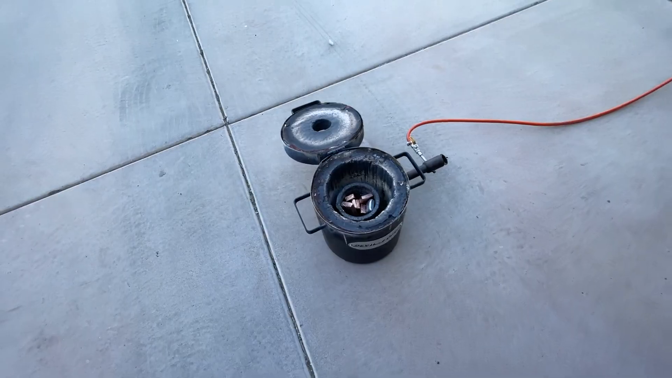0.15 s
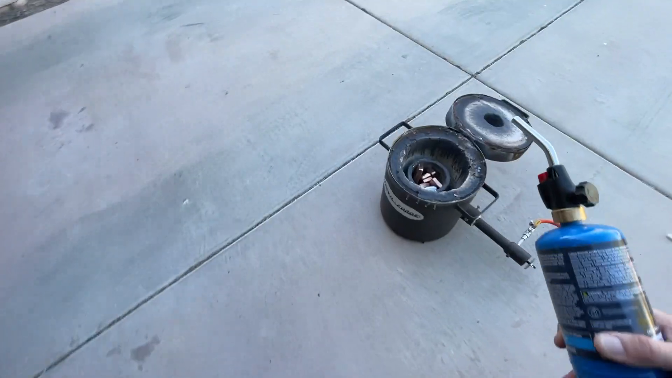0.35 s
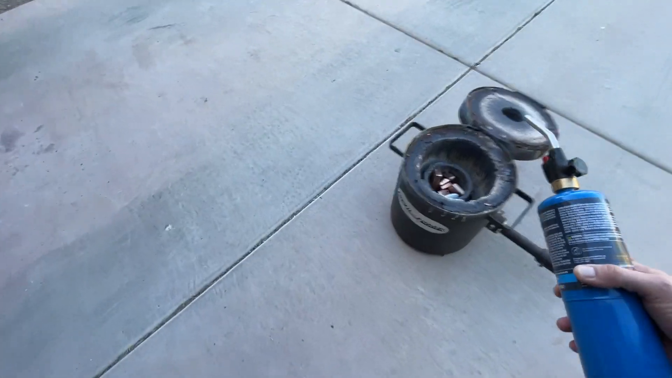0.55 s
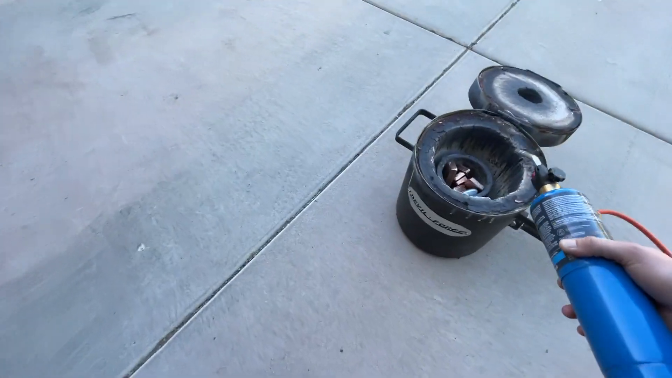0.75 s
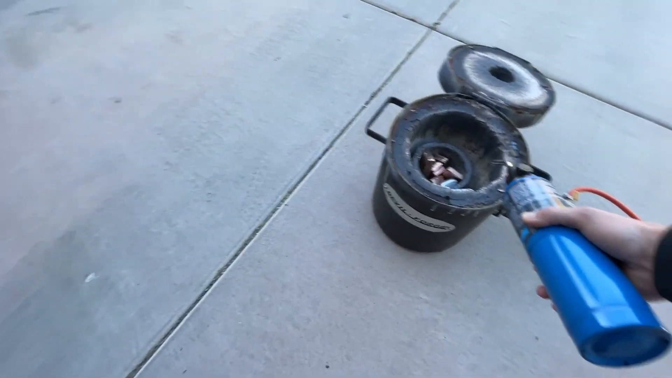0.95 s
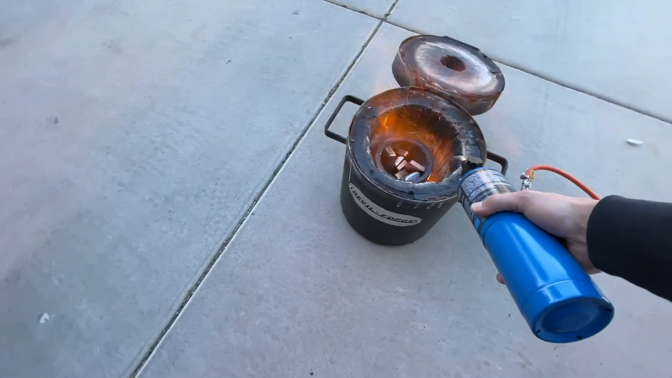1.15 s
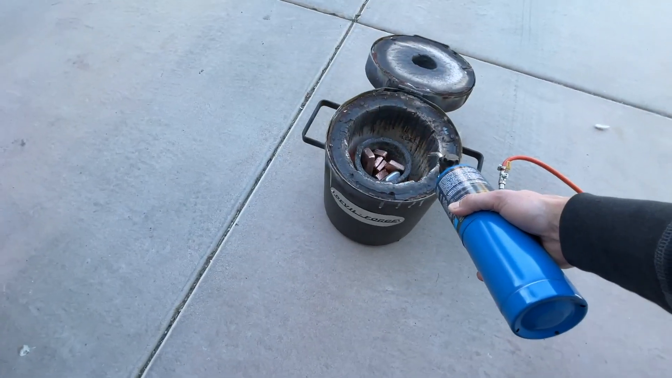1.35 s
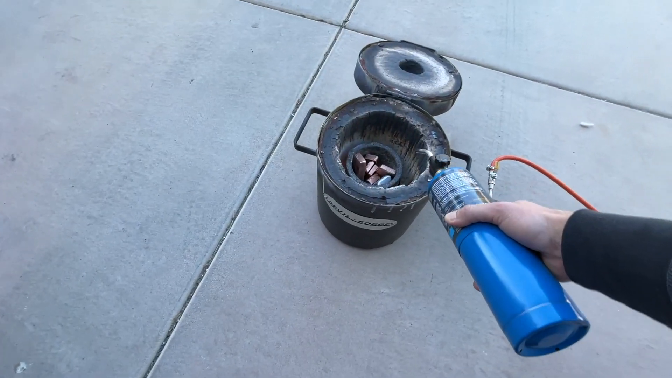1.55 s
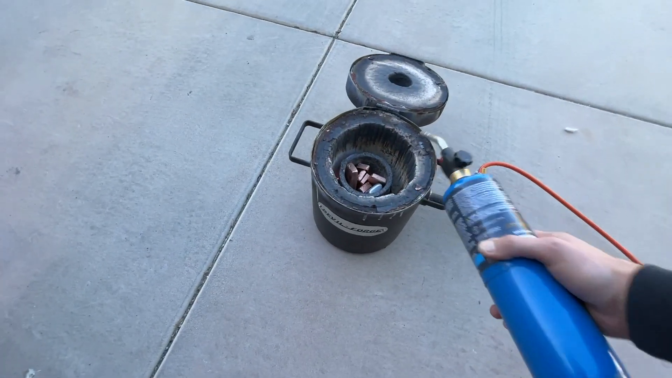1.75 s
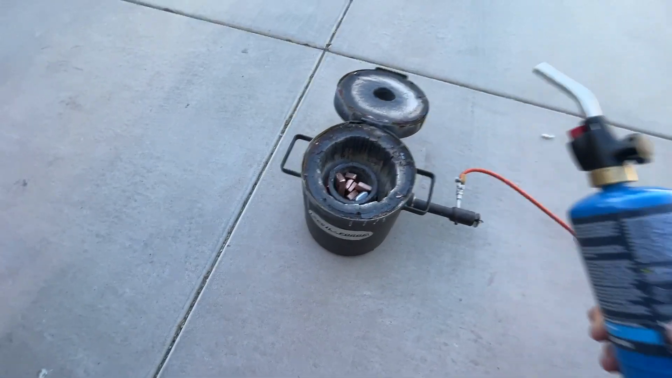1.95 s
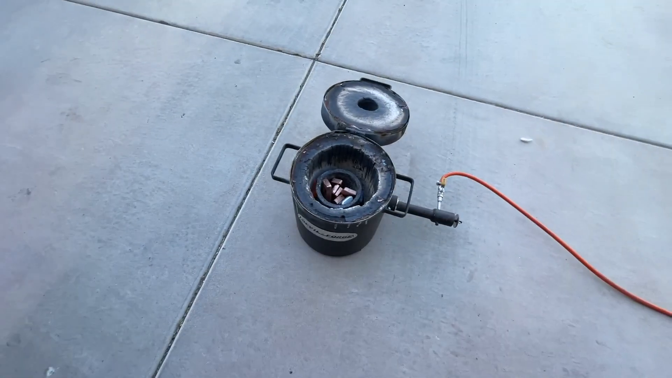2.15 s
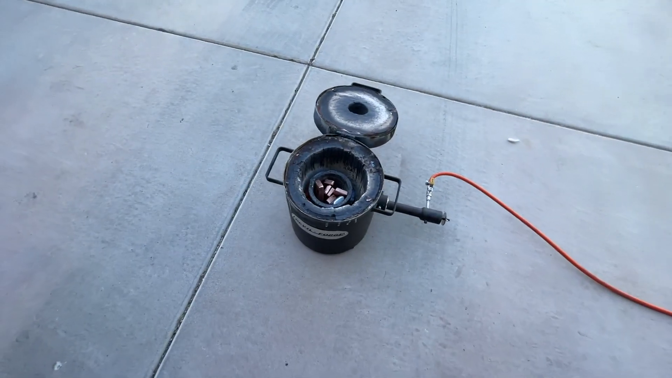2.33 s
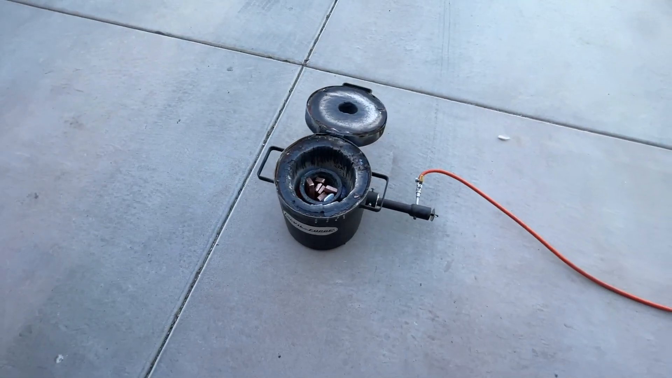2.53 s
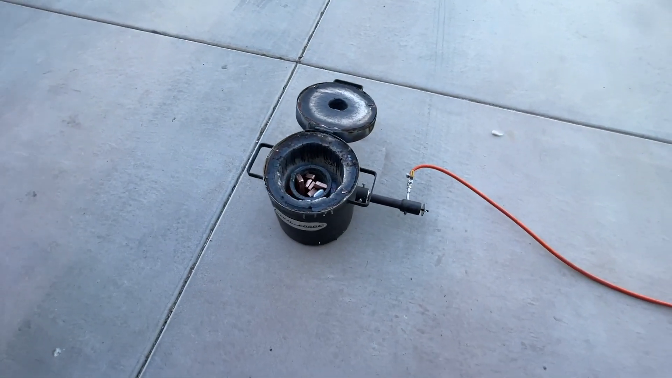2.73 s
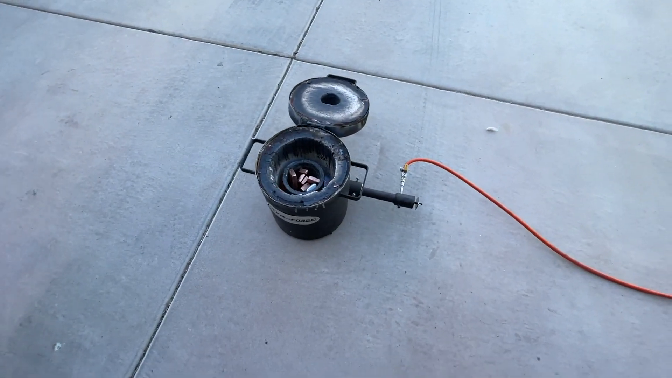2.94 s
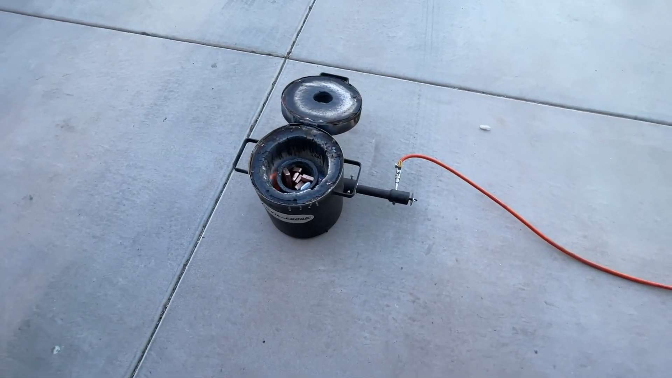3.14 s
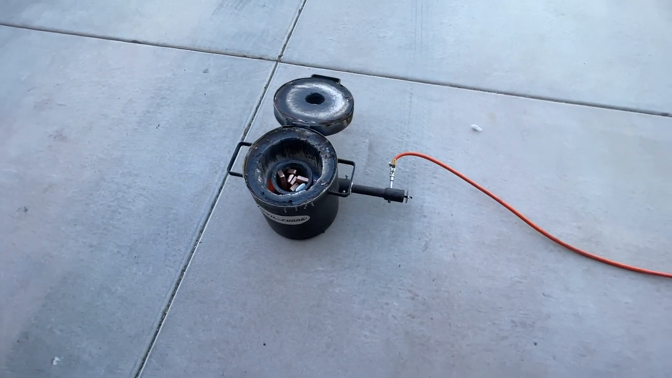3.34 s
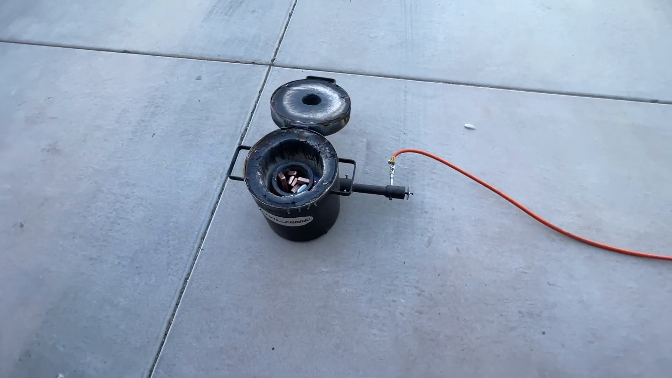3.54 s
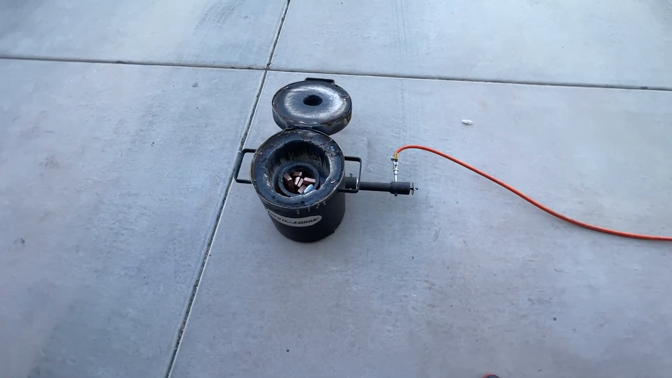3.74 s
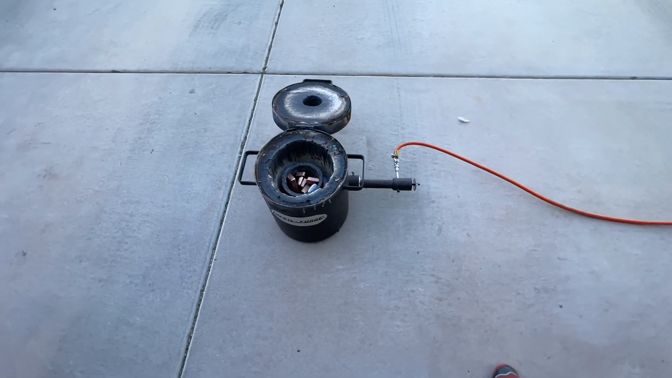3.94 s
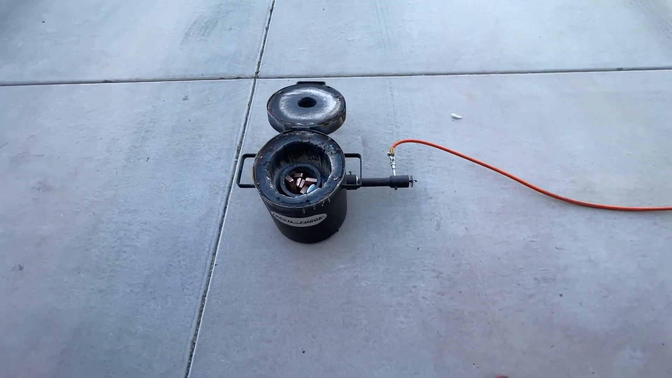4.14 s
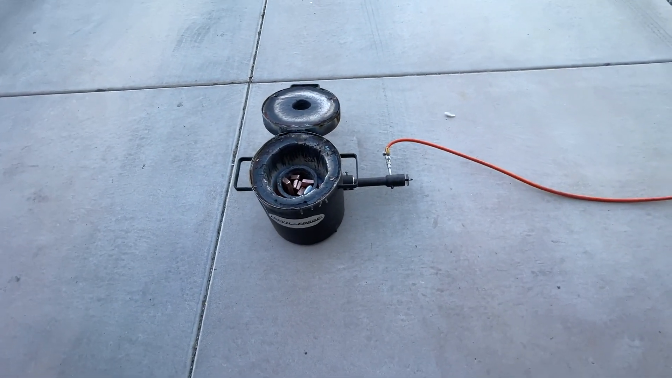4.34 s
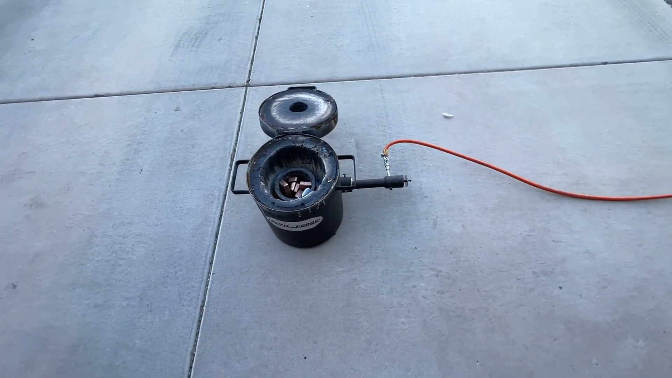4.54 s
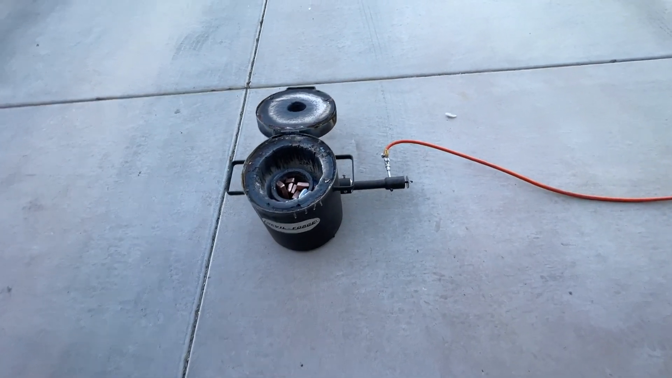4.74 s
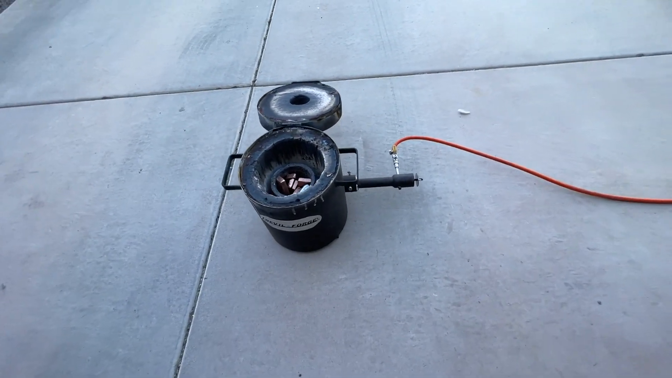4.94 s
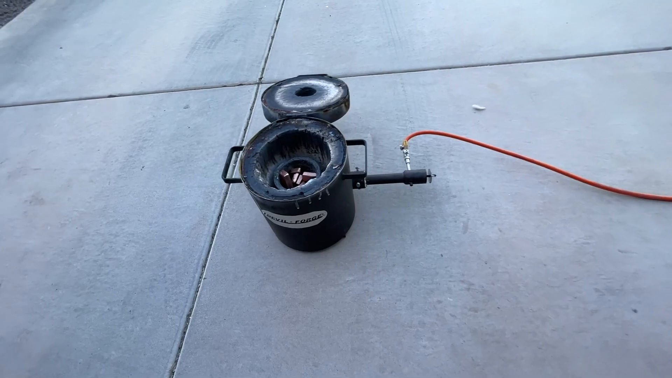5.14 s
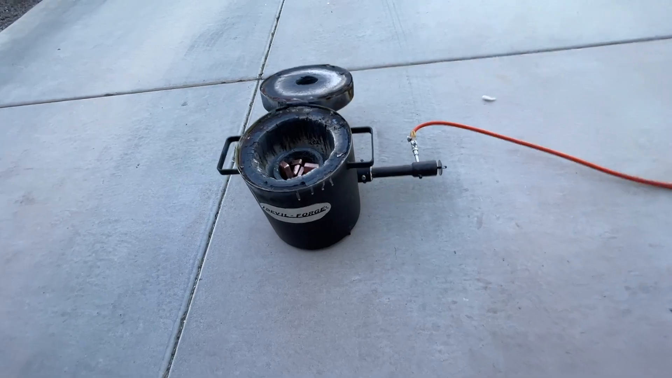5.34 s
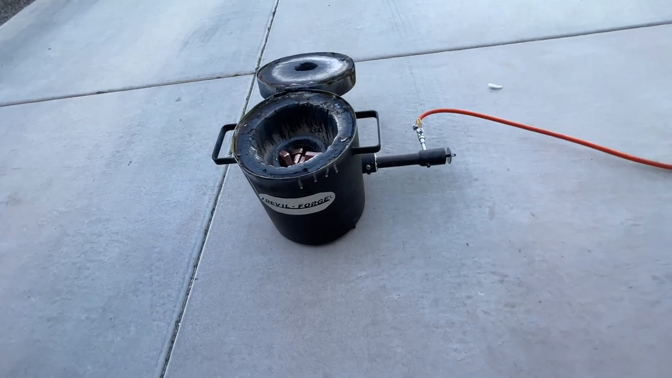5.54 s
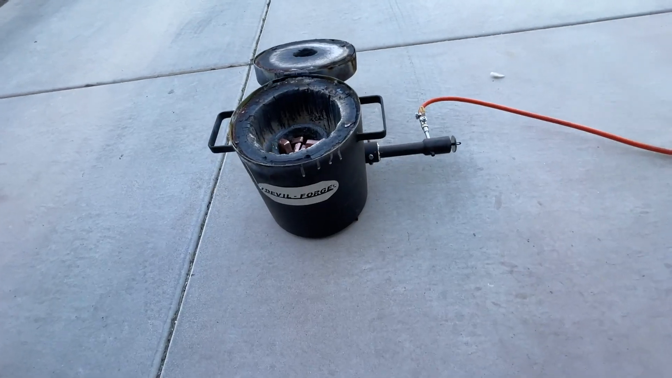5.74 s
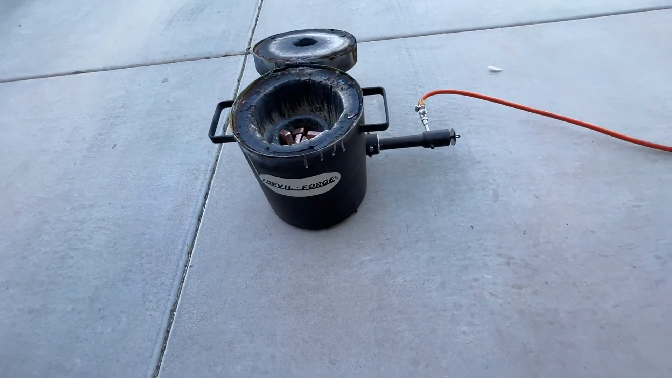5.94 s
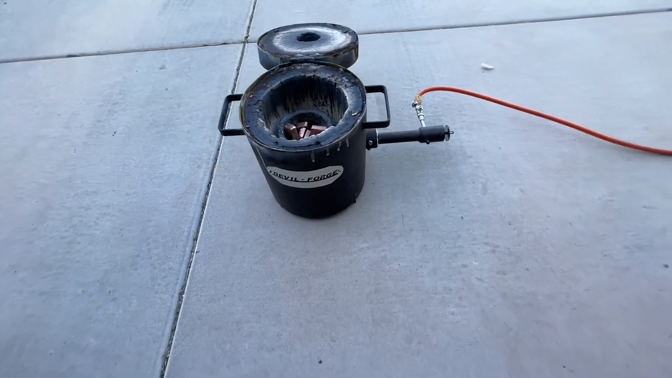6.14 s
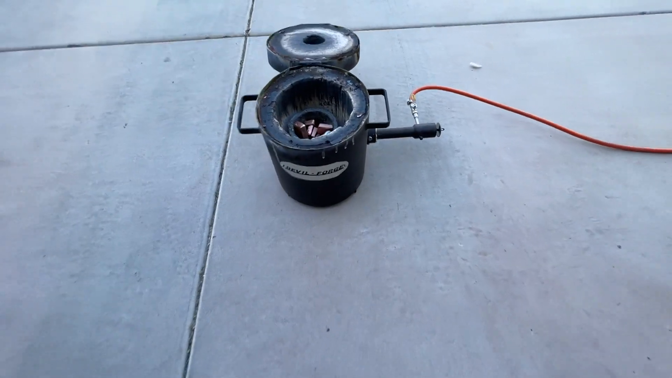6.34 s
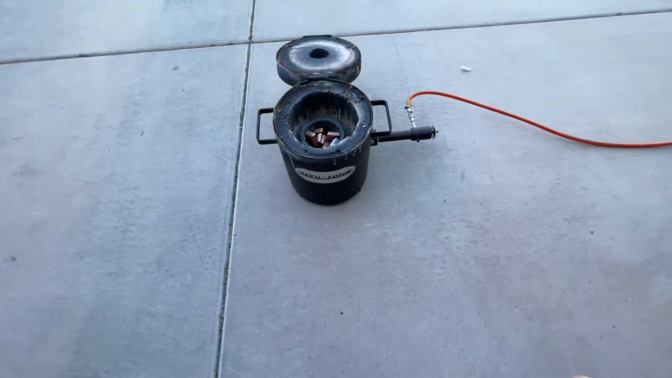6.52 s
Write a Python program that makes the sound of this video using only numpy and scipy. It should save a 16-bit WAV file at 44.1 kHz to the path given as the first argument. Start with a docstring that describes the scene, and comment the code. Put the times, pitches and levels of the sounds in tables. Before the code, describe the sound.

Hand torch rushes softly over hissing gas, a low booming whump ignites the burner, and a hollow roar continues with a late metallic rattle.

```python
"""A small propane furnace on a concrete drive, heard through a hand-held stereo microphone.
Over a low outdoor rumble and hum a trigger clicks; then gas hisses with a thin whistle and a hand torch rushes.
The mixture flares up with a pop: gusts of filtered noise and two low booms. Then the burner roars, as noise
shaped by the pot's resonances, and air rushes into its tube. Echoes off the holder's chest sweep as the microphone
is drawn in and held out again. Handling adds gritty scuffs, and near the end small metal parts tick."""
import sys
import numpy as np
from scipy import signal
from scipy.fft import rfft, irfft
from scipy.io import wavfile
from scipy.ndimage import uniform_filter1d

SR = 44100
rng = np.random.default_rng(int(sys.argv[2]) if len(sys.argv) > 2 else 0)


def log_audio(samples):
    """Write samples as a 16-bit WAV file to the path given in sys.argv[1]."""
    # one column per channel
    frames = np.atleast_2d(samples).T
    # limit to full scale, then quantise
    limited = np.clip(frames, -1, 1)
    pcm = np.round(limited * 32767).astype(np.int16)
    wavfile.write(sys.argv[1], SR, pcm)


N = 290178
HOP = 512  # samples between noise frames
TIME = np.arange(N) / SR
FRAMES = np.arange(N // HOP + 5)[:, None] * HOP / SR
HZ = np.fft.rfftfreq(2048, 1 / SR)
SOUND_M_PER_S = 343

# Colour tables give only the balance between pitches; a separate level sets the loudness.
# outdoor rumble, its colour: [f/Hz, level/dB per Hz]
YARD = [(30, 4), (50, -5), (75, 3.5), (140, -12), (220, -14), (330, -23), (600, -29), (1200, -30.5),
        (2400, -44), (6000, -43)]
YARD_DB = -58.5
# tones of the distant hum before it sinks: [f/Hz, level/dB]
HUM = [(75.4, -70), (118.4, -67.5), (177.6, -76), (236.9, -64.5)]
HUM_SINKS_AT_S, HUM_SINK_DB = 0.4, 5

# the torch's trigger click: (t/s, level/dB, decay/s)
TRIGGER = (.279, -58, .0022)
# its colour: [f/Hz, level/dB per Hz]
TRIGGER_COLOUR = [(500, -6), (950, 0), (1400, -11), (2000, -3), (3000, -20), (6000, -32)]

# colour of the gas jet's hiss: [f/Hz, level/dB per Hz]
JET = [(1000, -37), (2200, -2), (3600, -1.5), (4600, -1), (5500, -1), (6300, -0.5), (7800, -1), (9000, 4.5),
       (9900, 0), (10700, 8.5), (11500, 7), (12100, 0.5), (12600, -34)]
# narrow resonances in the hiss: [f/Hz, width/Hz, lift/dB]
JET_PEAKS = [(4540, 90, 6), (5550, 240, 3.5), (9600, 500, 2.5)]
# the hiss sinks once for a moment: (t/s, depth/dB, half length/s)
JET_DIP = (3.57, 1.9, 0.21)
GAS_ON_S = 0.306
# rise and fall of the orifice's whistle, before trim and waver: [t/s, level/dB]
WHISTLE_LEVEL = [(.47, -51), (.7, -58), (.85, -51), (1.0, -66.5), (1.35, -70), (1.6, -58), (2.1, -61),
                 (2.3, -53), (2.6, -57.5), (2.96, -49.5), (3.15, -53.5), (3.6, -52), (3.8, -59),
                 (4.15, -64), (4.3, -60), (4.6, -67), (5.2, -52.5), (5.55, -56.5), (5.8, -61), (6.3, -51),
                 (6.58, -61)]
WHISTLE_HZ, WHISTLE_WIDTH_HZ = 11185, 85  # width: from the peak to 6 dB down
# likeness of left and right in the hiss: [f/Hz, coherence]
HISS_SAME = [(200, .7), (1000, 0.38), (3000, .05), (8000, .1), (9000, 0.2), (9700, 1), (13000, .99)]
# treble shift between the microphone's two ports: [f/Hz, left lead/rad]
PORT_PHASE = [(8700, 0), (9400, -2.2), (10100, -3.1), (10700, -3.7), (11200, -4.65), (11700, -5.9),
              (12100, -6.28)]

# colour of the torch flame: [f/Hz, level/dB per Hz]
TORCH = [(71, -27), (120, -8), (141, -3), (330, -3), (456, -7), (740, -0.5), (820, -7), (1170, -5.5),
         (1520, -7.5), (1810, -8), (1980, -12), (2400, -15), (3700, -27), (5500, -31), (8800, -100)]
# the torch nozzle's faint singing: [f/Hz, width/Hz, lift/dB]
NOZZLE = [(4750, 350, 8), (5500, 390, 12)]
# the flame's bounce off the concrete, shifting as the torch is moved: [t/s, delay/s]
TORCH_ECHO = [(.5, 0.00257), (.9, 0.00326)]
TORCH_ECHO_SHARE = 0.076
# the torch starts loud and fades as it is turned into the pot
TORCH_START_DB, TORCH_FADE_DB_PER_S, TORCH_TURN_S = -46, 12, 0.49
# colour of the torch jet grazing the rim: [f/Hz, level/dB per Hz]
GRAZE = [(2500, -7), (4300, 2), (5300, -5.5), (6200, -1.5), (7100, 0), (8500, -4), (11000, -13),
         (12500, -7)]
# its passes over the rim: [t/s, level/dB, half length/s]
PASSES = [(1.468, -51, 0.086), (1.733, -51.5, 0.07), (1.95, -51.5, 0.069), (2.293, -58, 0.16)]

# scuffs of handling: [t/s, level/dB, decay/s]
SCUFFS = [(0.597, -53, 0.043), (5.335, -50, 0.032), (5.59, -46, 0.033), (5.63, -52, .03)]
# colour of the scuffs: [f/Hz, level/dB per Hz]
GRIT = [(1200, -4), (2600, 10), (4000, 0), (5500, -1), (7500, 4), (9000, 3), (11000, -4), (12500, -16)]

# gusts of the igniting flame front: [t/s, level/dB, half length/s, centre f/Hz, spread/octaves]
FLARE = [(1.07, -43.5, 0.012, 110, 0.48), (1.115, -42, 0.016, 139, 1.1), (1.14, -33, 0.015, 202, 1.4),
         (1.156, -36.5, 0.014, 1500, 2), (1.145, -31, 0.0033, 254, 1.4), (1.152, -27, 0.0051, 1120, 0.59),
         (1.152, -30, 0.0019, 2900, 1.25), (1.157, -13.5, 0.0022, 356, 0.41),
         (1.166, -40, 0.0037, 3500, 1.4), (1.168, -21.5, 0.012, 206, 0.96)]
# the expanding gas shoves the air, then the pot booms: [t/s, peak level/dB, half length/s, f/Hz]
BOOMS = [(1.147, -16.5, .0028, 110), (1.175, -12.0, .011, 91)]

# colour of air drawn into the burner tube: [f/Hz, level/dB per Hz]
INTAKE = [(1800, 4), (2800, 3), (3800, 1), (4600, -0.5), (4900, 0), (5400, -2.5), (6300, -1.5), (8000, -8)]
# rise and fall of that air, before trim and flutter: [t/s, level/dB]
INTAKE_LEVEL = [(1.4, -82), (1.9, -69), (2.85, -60.5), (3.45, -65.5), (3.7, -59.5), (3.9, -63.5),
                (4.1, -57), (4.5, -60), (4.75, -57), (4.9, -54), (5.1, -59), (5.8, -64.5), (6.05, -55.5),
                (6.25, -61), (6.55, -54)]
# how far the microphone is held from the chest: [t/s, distance/m]
REACH = [(1.75, 0.3), (2.03, 0.21), (2.3, 0.18), (2.6, 0.11), (4.2, 0.11), (4.7, 0.18), (5.02, 0.303),
         (5.78, 0.28), (6.55, 0.29)]

# colour of the burner roar from the pot's mouth: [f/Hz, level/dB per Hz]
ROAR = [(30, -38), (48, -32), (64, -3), (120, 2.5), (210, -1), (330, -1.34), (510, -7.5), (610, -11.5),
        (690, -19), (1150, -26.5), (1400, -27), (1800, -30.5), (2250, -33.5), (2700, -43), (3600, -47)]
LIT_S, ROAR_AT_1M_DB = 1.188, -23.5  # when the burner catches, and its level
# likeness of left and right in the roar: [f/Hz, coherence]
ROAR_SAME = [(120, 1), (250, 0.94), (500, 0.81), (700, 0.48), (1000, 0.98), (1500, 0.98), (1850, 0.88),
             (2300, 0.81), (3500, 0.58)]
# resonances of the pot's cavity, and the hollows between them: [f/Hz, width/Hz, lift/dB]
CAVITY = [(107, 31, 0.5), (239, 28, -1.5), (289, 22, 3), (385, 39, 0.5), (536, 89, 3), (596, 43, -2.5),
          (802, 106, 4.5), (1200, 220, 4), (1813, 87, -11), (2350, 140, 2.2)]
# the resonances start flat by this share and rise as the pot's gas heats
COLD_FLAT_SHARE, WARMING_S = 0.064, 2.5
# two hollows from bounces that shift as the microphone moves
# the lower hollow: [t/s, f/Hz, depth/dB]
LOW_HOLLOW = [(1.86, 750, 27), (2.36, 720, 2.1), (4.39, 700, 1.5), (5.18, 716, 2.7), (6.5, 695, 9.6)]
# the higher hollow: [t/s, f/Hz, depth/dB]
HIGH_HOLLOW = [(1.52, 1190, 9.3), (2.41, 1180, 6.1), (3.54, 1350, 1.3), (4.64, 1355, 4.6),
               (6.19, 1410, 6.2)]
LOW_WIDTH_HZ, HIGH_WIDTH_HZ = 27, 62
# the sharpest resonance drifts and swells as the flame moves: [t/s, f/Hz, lift/dB]
TOP_RING = [(1.3, 1520, 5), (1.9, 1540, 2.3), (2.5, 1630, 2.8), (3.6, 1655, 8.5), (4.2, 1630, 10.5),
            (4.55, 1594, 10.5), (5.1, 1650, 4.4), (6.5, 1580, 6.2)]
TOP_RING_WIDTH_HZ = 70
# how far the microphone is from the pot's mouth: [t/s, distance/m]
DISTANCE = [(1.29, 0.99), (1.73, 0.9), (3.08, 1.23), (4.51, 1.285), (5.05, 1.06), (5.4, 1.04), (5.77, 0.92),
            (6.28, 0.89), (6.58, 1.1)]
# colour change by the open mouth for each halving of distance: [f/Hz, lift/dB]
MOUTH = [(200, 4.5), (430, -3), (590, 10), (820, 3), (1100, 0), (2500, 5.5)]
# the torch bottle throws the roar into the right port until it is taken away: [f/Hz, lift/dB]
BOTTLE = [(300, 2), (450, -1.5), (620, 3.5), (770, 10), (950, 7), (1400, 6), (2000, -2.5)]
BOTTLE_GONE_S = 2.18  # middle of its leaving
# the young flame sputters with extra flutter until it settles
SPUTTER_DB, SETTLING_S = 1.36, 1.2

# ticks of small metal parts in the hand: [t/s, level/dB, tilt/dB per octave]
TICKS = [(5.5889, -34, 0.5), (5.612, -39, 4.5), (5.627, -39.5, 1)]
# how the parts ring, before each tick's level and tilt: [f/Hz, level/dB, time to fall 60 dB/s]
TICK_MODES = [(2380, -11, .06), (2930, -6, 0.029), (3450, -9.5, 0.023), (4000, -4.5, 0.016),
              (8667, -7, 0.02), (9900, -17, .035), (11100, -12, .025)]


def amp(db):
    """Turns decibels into a plain multiplier."""
    return 10 ** (np.asarray(db) / 20)


def unit(x):
    """Scales a signal to an rms of 1."""
    return x / np.sqrt(np.mean(x ** 2) + 1e-20)


def colour(points, hz=HZ):
    """Reads a table along a log-frequency axis."""
    f, value = np.transpose(points)
    return np.interp(np.log(hz + 1), np.log(f + 1), value)


def band(points):
    """A spectrum in dB that falls 20 dB per octave beyond its ends."""
    nearest = np.clip(HZ + 1, points[0][0], points[-1][0])
    octaves_outside = abs(np.log2((HZ + 1) / nearest))
    return colour(points) - 20 * octaves_outside


def peaks(modes, hz=HZ):
    """The lift in dB of a set of resonances; each width spans half the lift."""
    return sum(db / (1 + (2 * (hz - centre) / width) ** 2) for centre, width, db in modes)


def curve(rows, t=TIME, column=1):
    """Reads one column of a table along time."""
    rows = np.asarray(rows)
    return np.interp(t, rows[:, 0], rows[:, column])


def opening(s, ramp_s):
    """Rises from 0 to 1 around time s."""
    return np.clip((TIME - s) / ramp_s + .5, 0, 1)


def swell(s, half_s):
    """A smooth rise and fall around time s."""
    return np.exp(-.5 * ((TIME - s) / half_s) ** 2)


def burst(s, decay_s):
    """A sharp start at time s that dies away."""
    return (TIME > s) * np.exp(-np.maximum(TIME - s, 0) / decay_s)


def eddies(rate_hz):
    """Smooth random motion up to about a given rate, rms 1."""
    f = np.fft.rfftfreq(N, 1 / SR)
    slow_pass = (f > 2) / (1 + (f / rate_hz) ** 4)
    return unit(irfft(rfft(rng.standard_normal(N)) * slow_pass, N))


def patches(frames, bins):
    """A random field over time and frequency, rms 1, smoothed over some frames and frequency bins."""
    field = rng.standard_normal((len(FRAMES), len(HZ)))
    field = uniform_filter1d(field, size=frames, axis=0)
    return unit(uniform_filter1d(field, size=bins, axis=1))


def noise(shape_db, same, pan_db=0, lead_s=0, paths=1):
    """Stereo noise with a colour, left-right likeness, balance (plus is left), left lead and echo paths."""
    a, b, c, d = rng.standard_normal((4, len(FRAMES), len(HZ)), dtype=np.float32)
    same = np.clip(same, -1, 1)
    left = a + 1j * b
    right = same * left + np.sqrt(1 - same ** 2) * (c + 1j * d)
    right = right * np.exp(-2j * np.pi * HZ * lead_s)
    gain = amp(shape_db)
    gain = gain / np.linalg.norm(gain, axis=-1, keepdims=True)  # the colour alone never changes loudness
    spectrum = np.array([left * amp(pan_db / 2), right * amp(-pan_db / 2)]) * paths * gain
    sound = signal.istft(spectrum, nperseg=4 * HOP, noverlap=3 * HOP, time_axis=1, freq_axis=2)[1]
    return unit(sound[:, :N])


def yard():
    """Low outdoor rumble is coloured noise; a distant hum is steady tones that sink in level."""
    hum = sum(amp(db) * np.sqrt(2) * np.sin(2 * np.pi * (hz * TIME + rng.random())) for hz, db in HUM)
    rumble = amp(YARD_DB) * noise(band(YARD), 0.35)
    return rumble + hum * amp(-HUM_SINK_DB * opening(HUM_SINKS_AT_S, .2))


def trigger():
    """The torch's trigger makes one small dry click, a very short burst of noise."""
    s, db, decay_s = TRIGGER
    return amp(db) * burst(s, decay_s) * noise(band(TRIGGER_COLOUR), 0.52, pan_db=-3)


def gas(hiss_db=-53.0, whistle_trim_db=-0.8, waver_db=2.5, ripple_db=3.6):
    """A gas jet makes broad noise and its orifice a narrow whistle; treble is shifted between the ports."""
    lead_s = colour(PORT_PHASE) / (2 * np.pi * (HZ + 1))
    # balance of the hiss: (f/Hz, left over right/dB)
    lean_db = colour([(3500, 1.0), (5500, 5.5), (6800, 4.0), (8000, 0.0), (8800, -2.5), (9600, 0.0)])
    hiss_shape_db = band(JET) + peaks(JET_PEAKS) + ripple_db * patches(frames=50, bins=6)
    hiss = noise(hiss_shape_db, colour(HISS_SAME), lean_db, lead_s)
    dip_s, dip_db, dip_half_s = JET_DIP
    flutter_db = .8 * eddies(12)
    hiss *= amp(hiss_db - dip_db * swell(dip_s, dip_half_s) + flutter_db)
    peak_db = -20 * np.log10(1 + ((HZ - WHISTLE_HZ) / WHISTLE_WIDTH_HZ) ** 2)
    whistle = noise(peak_db, 0.98, 0.65, lead_s)
    whistle *= amp(curve(WHISTLE_LEVEL) + whistle_trim_db + waver_db * eddies(9.0))
    return (hiss + whistle) * opening(GAS_ON_S, 0.019)


def furnace_colour():
    """The pot's resonances rise as its gas warms, and bounces cut two moving hollows into them (dB)."""
    flat = COLD_FLAT_SHARE * np.exp(-np.maximum(FRAMES - LIT_S, 0) / WARMING_S)
    hollows_db = 0
    for rows, width_hz in ((LOW_HOLLOW, LOW_WIDTH_HZ), (HIGH_HOLLOW, HIGH_WIDTH_HZ)):
        depth_db = curve(rows, FRAMES, column=2)
        hollows_db = hollows_db + depth_db * np.exp(-.5 * ((HZ - curve(rows, FRAMES)) / width_hz) ** 2)
    return peaks(CAVITY, HZ / (1 - flat)) - hollows_db


def torch(flutter_db=1.0, dulling_db_per_s=9, pot_db=-57, pot_hz=620, pot_width_hz=35, pot_share=0.35):
    """Flame noise on the right dulls and sounds the pot as it turns in; passes over the rim sizzle."""
    turning_s = np.clip(FRAMES - GAS_ON_S, 0, TORCH_TURN_S)
    # treble takes more of the dulling: (f/Hz, share)
    dull_db = dulling_db_per_s * turning_s * colour([(1200, 0.18), (2800, 0.65)])
    pot_colour_db = pot_share * (turning_s / TORCH_TURN_S) ** 2 * furnace_colour()
    shape_db = band(TORCH) + peaks(NOZZLE) - dull_db + pot_colour_db
    bounce = 1 + TORCH_ECHO_SHARE * np.exp(-2j * np.pi * HZ * curve(TORCH_ECHO, FRAMES))
    # left-right likeness: (f/Hz, coherence)
    same = colour([(200, 0.96), (700, 0.25), (3000, 0.24)])
    flame = noise(shape_db, same, pan_db=-4.5, lead_s=-0.00008, paths=bounce)
    fade_db = TORCH_FADE_DB_PER_S * np.clip(TIME - GAS_ON_S, 0, TORCH_TURN_S)
    flame *= amp(TORCH_START_DB - fade_db + flutter_db * eddies(56.0)) * opening(GAS_ON_S, 0.015)
    pot_shape_db = -20 * np.log10(1 + ((HZ - pot_hz) / pot_width_hz) ** 2)
    pot = noise(pot_shape_db, 1.0, pan_db=-17) * amp(pot_db) * opening(0.7, 0.24)
    # balance of the sizzle: (f/Hz, left over right/dB)
    graze = noise(band(GRAZE), 0.77, pan_db=colour([(4500, 0.84), (6800, 14), (9000, 1)]))
    graze *= sum(amp(db) * swell(s, half_s) for s, db, half_s in PASSES)
    return (flame + pot) * (1 - opening(1.9, 0.48)) + graze


def handling():
    """Rubbing hands make short gritty scuffs: noise with a sharp start."""
    envelope = sum(amp(db) * burst(s, decay_s) for s, db, decay_s in SCUFFS)
    return envelope * noise(band(GRIT), 0.43, pan_db=3)


def ignition(apart=0.33, echo_share=.45, echo_ms=1.96):
    """The flame front runs through the pot in gusts of noise and sets the cavity booming."""
    hz = np.fft.rfftfreq(N, 1 / SR) + 1
    gusts = np.zeros((2, N))
    echo = 1 + echo_share * np.exp(-2j * np.pi * hz * echo_ms / 1000)
    for s, db, half_s, centre_hz, spread in FLARE:
        shape = echo * np.exp(-.5 * (np.log2(hz / centre_hz) / spread) ** 2)
        window = swell(s, half_s)
        mid, side = irfft(rfft(rng.standard_normal((2, N))) * shape, N) * window
        gust = unit(np.array([mid + apart * side, mid - apart * side]))
        gusts += amp(db) * np.sqrt(np.mean(window ** 2)) * gust
    booms = sum(amp(db) * swell(s, half_s) * np.cos(2 * np.pi * boom_hz * (TIME - s))
                for s, db, half_s, boom_hz in BOOMS)
    return gusts + booms


def body_echo(left_share=0.11, right_share=0.23, near_extra_m=0.036, far_extra_m=0.062, size_hz=110,
              left_notch_db=6, right_notch_db=11.0, notch_octaves=0.13):
    """Chest echoes carve notches that sweep up as the microphone draws in; up close the lowest is deep."""
    right_m = curve(REACH, FRAMES)
    left_m = right_m + np.interp(right_m, [.09, .34], [near_extra_m, far_extra_m])
    bounced = HZ / np.hypot(HZ, size_hz)  # the body reflects deep bass poorly
    paths = []
    for share, notch_db, m in ((left_share, left_notch_db, left_m), (right_share, right_notch_db, right_m)):
        echo = share * bounced * np.exp(-2j * np.pi * HZ * 2 * m / SOUND_M_PER_S)
        # lowest notch: the chest is a quarter wavelength away
        notch = np.exp(-.5 * (np.log2((HZ + 1) * 4 * m / SOUND_M_PER_S) / notch_octaves) ** 2)
        close = np.interp(m, [.19, .27], [1, 0])
        paths.append((1 + echo) * amp(-notch_db * close * notch))
    return np.array(paths)


def intake(trim_db=4.5, flutter_db=1.5):
    """Once the burner draws, air rushing in at the tube makes fluttering noise on the left."""
    rush = noise(band(INTAKE), 0.52, pan_db=5.5, lead_s=0.00015, paths=body_echo())
    level_db = curve(INTAKE_LEVEL) + trim_db + flutter_db * eddies(33)
    return rush * amp(level_db) * opening(LIT_S, .1)


def flame_shifts(patchy_db=0.72):
    """The flame wanders: upper ridges come and go, and the sharpest resonance drifts (dB)."""
    ring_lift_db = curve(TOP_RING, FRAMES, column=2)
    ring_db = peaks([(curve(TOP_RING, FRAMES), TOP_RING_WIDTH_HZ, ring_lift_db)])
    ridges_db = patchy_db * patches(frames=12, bins=5) * np.clip(HZ / 600, 0, 1) ** 2
    return ridges_db + ring_db


def roar(flutter_db=1.0, spit_db=0.45, surge_db=.5, bottle_lead_ms=0.021, lead_ms=0.1, leaving_s=1.0,
         dull_start_db=5, brighten_s=0.13):
    """Turbulent burning fills the pot's resonances and soon brightens; nearer is louder and fuller."""
    dull_db = dull_start_db * np.exp(-np.maximum(FRAMES - LIT_S, 0) / brighten_s)
    dull_db = dull_db * np.clip(HZ / 1000 - 1, 0, 1)
    mouth_db = -np.log2(curve(DISTANCE, FRAMES)) * colour(MOUTH)
    shape_db = band(ROAR) + furnace_colour() + flame_shifts() - dull_db + mouth_db
    bottle = np.clip((BOTTLE_GONE_S - FRAMES) / leaving_s + .5, 0, 1)
    thrown_db = bottle * colour(BOTTLE)
    # balance without the bottle: (f/Hz, left over right/dB)
    lean_db = colour([(120, 0.1), (400, -0.5), (540, -0.5), (720, 5.0), (1150, 6.5), (1700, 1.5), (2500, -1.0)])
    lead_s = (lead_ms + bottle * (bottle_lead_ms - lead_ms)) / 1000
    flame = noise(shape_db + 0.52 * thrown_db, colour(ROAR_SAME), lean_db - thrown_db, lead_s, body_echo())
    bass = signal.sosfiltfilt(signal.butter(2, 650, fs=SR, output="sos"), flame)
    treble = flame - bass
    gusts = eddies(195)  # the same eddies shake bass and treble
    sputter_db = SPUTTER_DB * burst(LIT_S, SETTLING_S) * eddies(40)
    flame = bass * amp(flutter_db * gusts) + treble * amp(spit_db * gusts + sputter_db)
    level = amp(ROAR_AT_1M_DB + surge_db * eddies(6.6)) / curve(DISTANCE)
    return flame * level * opening(LIT_S, 0.032)


def ticks(snap_db=-2, snap_s=.001, tilt_pivot_hz=5000):
    """Small metal parts knock: a snap of noise and a short ring, brighter or duller with each blow."""
    out = np.zeros((2, N))
    for s, db, tilt_db in TICKS:
        t = TIME[:N - round(s * SR)]
        ring = 0
        for hz, mode_db, t60_s in TICK_MODES:
            level_db = mode_db + tilt_db * np.log2(hz / tilt_pivot_hz) - 60 * t / t60_s
            phase = rng.random() + 0.23 * rng.random((2, 1))  # slightly apart in the two ears
            ring = ring + amp(level_db) * np.sin(2 * np.pi * (hz * t + phase))
        snap = amp(snap_db) * np.exp(-t / snap_s) * rng.standard_normal((2, len(t)))
        out[:, -len(t):] += amp(db) * (ring + snap)
    return out


def scene():
    """Adds up all the sounds, in the order they first appear."""
    before = yard() + trigger() + gas() + torch() + handling()
    return before + ignition() + intake() + roar() + ticks()


def record(dry, low_cut_hz=42, ceiling=.29, top_hz=12600):
    """Cuts the deepest rumble, rounds off the loudest peaks and removes the highest treble."""
    dry = signal.sosfiltfilt(signal.butter(3, low_cut_hz, "highpass", fs=SR, output="sos"), dry)
    held = dry / (1 + (dry / ceiling) ** 8) ** (1 / 8)
    low_pass = signal.firwin(301, top_hz, window=("kaiser", 8), fs=SR)
    return signal.oaconvolve(held, low_pass[None], "same")


dry = scene()
out = record(dry)
log_audio(out)
```